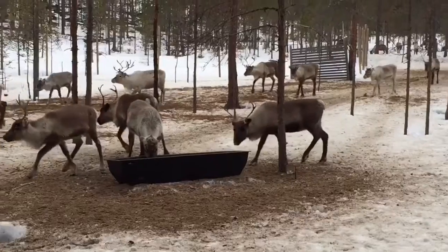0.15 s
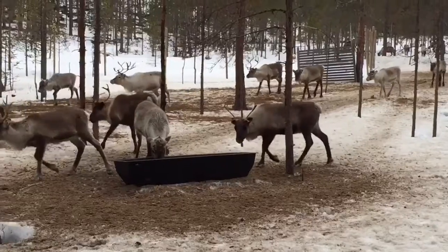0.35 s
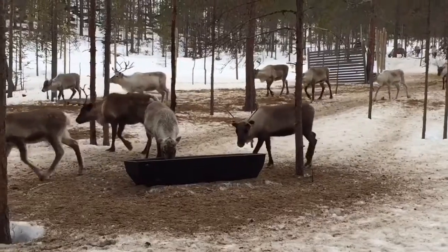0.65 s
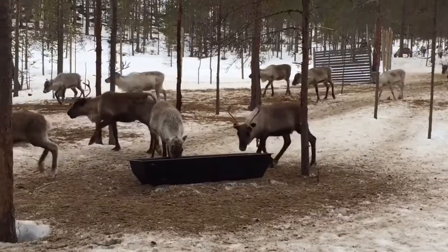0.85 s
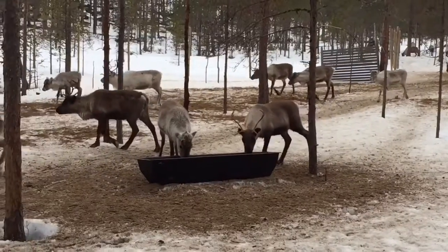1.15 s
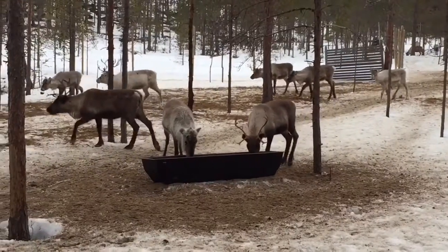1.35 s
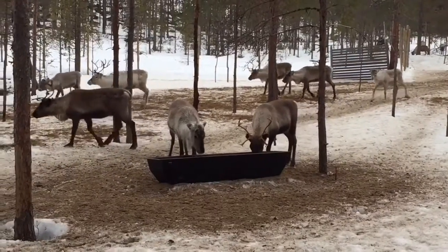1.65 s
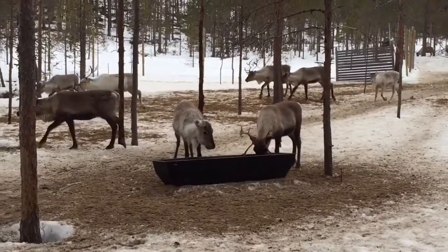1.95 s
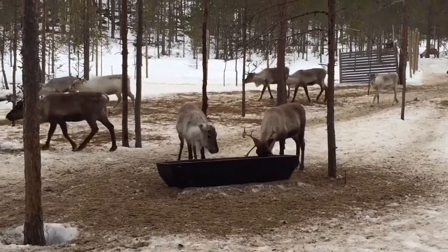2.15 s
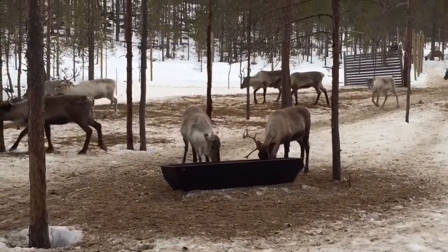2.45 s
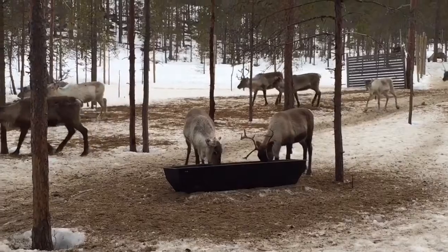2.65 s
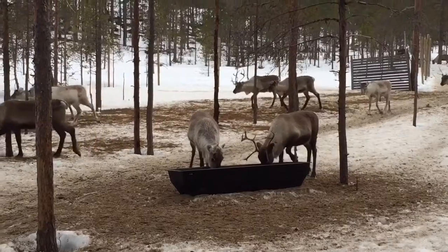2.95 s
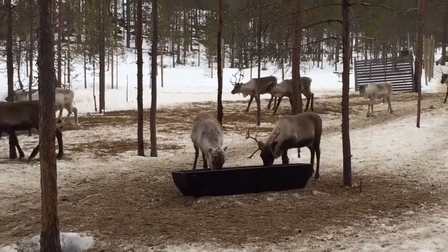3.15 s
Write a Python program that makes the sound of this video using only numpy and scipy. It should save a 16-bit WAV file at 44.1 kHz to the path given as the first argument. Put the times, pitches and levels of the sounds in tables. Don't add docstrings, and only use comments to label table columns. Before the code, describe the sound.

A dull metal collar bell clanks unevenly throughout, its hum often choked by fur. Soft hoof thuds and small dry clicks lie beneath it, with faint wind, in an open snowy pine wood, heard from some metres away.

```python
import sys
import numpy as np
from scipy import signal
from scipy.fft import rfft, irfft, next_fast_len
from scipy.io import wavfile
from scipy.ndimage import map_coordinates

SR = 44100
rng = np.random.default_rng(int(sys.argv[2]) if len(sys.argv) > 2 else 0)


def file_out(sig):
    cols = np.atleast_2d(sig).T
    lim = np.clip(cols, -1, 1)
    pcm = np.round(lim * 32767).astype(np.int16)
    wavfile.write(sys.argv[1], SR, pcm)


def field_ratio(decibels):
    return 10 ** (np.asarray(decibels, dtype=float) / 20)


N = 145530

# frequency_hz, level_db
IMPACT_SPECTRUM = [(700, -13), (1000, 17), (1600, -12), (2400, 5.4), (5000, 1.5), (10000, -3.5),
                   (15000, -4)]
TONE_HZ = [958, 1839, 3413]


def unit(x):
    return x / np.sqrt(np.mean(x ** 2) + 1e-20)


def wobble(rate):
    return map_coordinates(rng.standard_normal(int(N * rate / SR) + 4), [np.arange(N) * rate / SR])


def filtered(x, response):
    m = next_fast_len(len(x) + 8192)
    return irfft(rfft(x, m) * response(np.fft.rfftfreq(m, 1 / SR)), m)[:len(x)]


def coloured(points, size):
    f, db = np.transpose(points)
    return unit(filtered(rng.standard_normal(size), lambda hz: field_ratio(np.interp(np.log(hz + 1), np.log(f), db))))


def resonance(hz, width_hz):
    return lambda f: (f * width_hz / (hz * hz - f * f + 1j * f * width_hz)) ** 2


def add(into, s, x):
    part = into[round(s * SR):][:len(x)]
    part += x[:len(part)]


def distant_tread():
    ground_hz, level_db, lump_db = 99.4, -71, 6.5
    tread = filtered(rng.standard_normal(N), resonance(ground_hz, ground_hz))
    return field_ratio(level_db) * unit(tread * field_ratio(lump_db * wobble(13)))


def wind():
    # frequency_hz, density_db
    wind_spectrum = [(22, -51), (50, -1.5), (90, -1.6), (170, -8), (600, -11.5), (2230, -7), (4000, -11),
                     (15500, -20.5)]
    level_db = -62 + 2.4 * wobble(3.35) + 1.33 * wobble(14)
    return field_ratio(level_db) * coloured(wind_spectrum, N)


def trunk_echo(near):
    level_db, t60, first_return_s = -14, 0.33, 0.008
    u = np.arange(SR // 3) / SR
    tail = rng.standard_normal(len(u)) * field_ratio(-60 * u / t60) * (u > first_return_s)
    return field_ratio(level_db) * signal.fftconvolve(near, tail / np.linalg.norm(tail))[:N]


def hooves():
    # start_s, level_db, pitch_hz, length_s
    hoof_steps = [(.225, -64, 307, 0.039), (.425, -61.5, 320, 0.029), (.553, -56.5, 141.6, 0.037),
                  (.875, -67, 134, .03), (1.055, -51.5, 740, 0.0097), (1.06, -54, 135, 0.031),
                  (1.21, -61.5, 104, 0.0368), (1.289, -61, 600, 0.026), (1.41, -54.5, 880, 0.022),
                  (1.415, -55, 228, 0.025), (1.61, -65.5, 359, 0.0325), (2.09, -59.5, 106, 0.077),
                  (2.57, -64, 330, 0.065), (2.777, -61.5, 91, 0.027), (2.78, -62.5, 304, .03),
                  (2.81, -56.5, 398, 0.067), (2.88, -62.5, 462, 0.069), (3.128, -59.5, 275, 0.0332)]
    out = np.zeros(N)
    for s, db, hz, length in hoof_steps:
        u = np.arange(round(length * SR) + 2) / (length * SR)
        push = unit(filtered(rng.standard_normal(len(u)), resonance(hz, 0.9 * hz)))
        pressure = np.sin(np.pi * np.sqrt(np.clip(u, 0, 1)))
        add(out, s, field_ratio(db) * push * pressure)
    return out


def clicks():
    # start_s, level_db
    tendon_clicks = [
        (0.7392, -44),
        (1.0868, -38),
        (1.1548, -57.5),
        (1.3493, -41),
        (1.6566, -38.5),
        (1.7449, -47),
        (2.5769, -33.5),
        (2.6326, -38),
        (2.9598, -37.5),
        (3.2768, -32.5),
    ]
    t60, trim_db = 0.004, -6
    crumbs_per_s, crumb_db = 60, -65.5
    out = np.zeros(N)
    u = np.arange(SR // 50) / SR
    snap = coloured(IMPACT_SPECTRUM, N + SR)
    events = [(s, db + trim_db) for s, db in tendon_clicks]
    for place, chance in rng.random((int(crumbs_per_s * N / SR), 2)):
        events.append((place * N / SR, crumb_db - 3.77 * np.log(chance)))
    for s, db in events:
        add(out, s, field_ratio(db - 60 * u / t60) * snap[round(s * SR):][:len(u)])
    return out


def shell_haze():
    modes, width_hz = 170, 22
    mode_hz = 1900 + 13300 * rng.random(modes)
    gain = field_ratio(4.5 * rng.standard_normal(modes))

    def thin_modes(f):
        return sum(g * width_hz / (width_hz + 2j * (f - c)) for c, g in zip(mode_hz, gain))

    return unit(filtered(coloured(IMPACT_SPECTRUM, N), thin_modes))


def clapper_contacts():
    # start_s, clank_db, hum_db, second_tone_db, third_tone_db
    blows = [(0.1986, -25.5, -45.5, -46, -48.5), (0.355, -19, -41.5, -45.5, -34),
             (0.5425, -28.5, -35.5, -45.5, -54.5), (0.8575, -25.5, -43.5, -50.5, -47),
             (0.9672, -28, -41, -49, -51.5), (1.1954, -26, -44.5, -49, -46.5),
             (1.4733, -27.5, -45, -55, -49), (1.5518, -29.5, -55, -52, -52),
             (1.8237, -23.5, -36, -44, -49.5), (2.0886, -23, -49.5, -40, -43.5),
             (2.2167, -24, -37.5, -48, -47), (2.4269, -27.5, -38.5, -49, -64),
             (2.6983, -26.5, -38, -49.5, -49.5), (2.784, -28, -38, -46.5, -47),
             (2.9971, -30, -34.5, -47, -49)]
    # start_s, clank_db, hum_db, second_tone_db, third_tone_db
    rebounds = [(0.0279, -36.5, -44.5, -50.5, -65), (0.044, -43, -58.5, -52.5, -88),
                (0.2205, -33.5, -52, -49.5, -54.5), (0.5908, -32.5, -37, -58, -58),
                (0.6544, -32.5, -47, -54, -72), (1.1903, -32, -54, -46.5, -47.5),
                (1.245, -36, -47.5, -49.5, -56), (1.481, -28.5, -42.5, -53.5, -46.5),
                (1.575, -32, -50, -47, -71), (1.6044, -38.5, -56, -57, -58),
                (1.8715, -44.5, -45, -48.5, -50), (2.4889, -34, -48, -75, -72),
                (2.5085, -43.5, -63, -56, -71.5), (2.828, -35, -41.5, -54, -49),
                (3.0762, -42.5, -45, -50, -66), (3.1419, -44.5, -43, -57.5, -78)]
    # clank_db, hum_db, second_tone_db, third_tone_db
    ringing_db = (-38.5, -41.5, -47, -61)
    rows = np.array([(0, *ringing_db, 1)] + [(*r, 1) for r in blows] + [(*r, 0) for r in rebounds])
    return rows[np.argsort(rows[:, 0])]


def fur_choke():
    # start_s, length_s, loss_db (negative = mouth swings nearer)
    chokes = [(0.052, 0.065, 3), (0.328, 0.037, 16), (0.355, 0.06, 9.5), (.44, 0.022, 4.5),
              (0.603, 0.026, -0.5), (0.75, 0.1, 17.5), (1.025, .06, 9), (1.085, 0.023, -3.5),
              (1.275, 0.033, 52), (1.504, .05, 4), (1.607, .05, 18), (1.838, 0.032, 5.5),
              (1.875, 0.044, 11), (1.977, 0.051, 8), (2.109, .05, 6.5), (2.153, 0.05, -12),
              (2.263, 0.065, 10), (2.473, 0.026, 5.5), (2.519, 0.045, 19), (2.894, 0.032, 7.5),
              (3.01, 0.048, 6), (3.229, 0.068, 18)]
    t = np.arange(N) / SR
    lost_db = np.zeros(N)
    for s, length, db in chokes:
        progress = np.clip((t - s) / abs(length), 0, 1)
        lost_db += db * (1 - np.cos(np.pi * progress)) / 2
    return lost_db


def long_tones(contacts, choked_db, sway):
    # t60_s, choke_share
    decays = [
        (2.43, 0.94),
        (0.67, 0.67),
        (0.39, 0.82),
    ]
    # above_hz, level_db
    twins = [
        (14, -26),
        (29, -8),
        (18, -14),
    ]
    rise_s, twin_spread_db = 0.00218, 3
    rebound_turn = 0.48
    t = np.arange(N) / SR
    start_s = contacts[:, 0]
    last = np.searchsorted(start_s, t, "right") - 1
    since = t - start_s[last]
    lost_db = choked_db - choked_db[(start_s[last] * SR).astype(int)]
    scatter = np.where(contacts[:, 5:], np.pi, rebound_turn)
    turns = np.cumsum(rng.standard_normal((len(contacts), 6)) * scatter, axis=0)
    spread_db = twin_spread_db * rng.standard_normal((len(contacts), 3))
    keep = np.exp(-1 / (rise_s * SR))
    out = np.zeros(N)
    for k, (tone_hz, (t60, share), (above_hz, twin_db)) in enumerate(zip(TONE_HZ, decays, twins)):
        size = np.sqrt(2) * field_ratio(contacts[last, 2 + k] - 60 * since / t60 - share * lost_db)
        main = np.exp(1j * turns[last, 2 * k])
        twin_phase = turns[last, 2 * k + 1] + 2 * np.pi * above_hz * since
        twin = field_ratio(twin_db + spread_db[last, k]) * np.exp(1j * twin_phase)
        envelope = signal.lfilter([1 - keep], [1, -keep], size * (main + twin))
        out += (envelope * np.exp(2j * np.pi * tone_hz * sway)).imag
    return out


def clanks(contacts, choked_db, sway):
    shell_hz = [2312, 2435, 2955, 3207, 4000, 4312, 4970, 5543, 5965, 6272, 6712, 6885, 7273]
    # level_db, t60_s
    shell_modes = [(-15.5, 0.15), (-30, 0.045), (-37.5, 0.21), (-30.5, 0.17), (-20.5, 0.077), (-25, 0.12),
                   (-38.5, 0.085), (-22, .14), (-28, 0.12), (-24, 0.084), (-26.5, .22), (-41, 0.17),
                   (-24, 0.076)]
    rim_hz = [8064, 8317, 9001, 9152, 9593, 10384, 11041, 11536, 12403, 12828, 13329, 13631, 13916, 14750]
    # start_s, frequency_hz, extra_db
    favours = [(.199, 2435, 25.5), (.199, 7273, 8), (.356, 4000, 12.5), (.543, 4000, 10.5),
               (.591, 6272, 13), (.655, 2312, 8.5), (.858, 5543, 11), (.968, 8317, 20), (.968, 2312, 0.5),
               (1.196, 4000, 14), (1.196, 6272, 17.5), (1.474, 2435, 24), (1.481, 4000, 13),
               (1.552, 4312, 13), (1.552, 5543, 15), (1.575, 2312, 5.5), (1.824, 6272, 7.5),
               (2.089, 5543, 10.5), (2.089, 13916, 13.5), (2.217, 6712, 11.5), (2.427, 6272, 12.5),
               (2.699, 5543, 13)]
    rim_db, rim_t60 = -30, 0.1
    spot_spread_db, choke_share = 4.5, 0.36
    crack_db, crack_t60, haze_db, haze_t60 = -13, 0.018, -13.5, 0.13
    mouth_hz, mouth_db, mouth_t60 = 1071, -0.5, 0.066
    hz = np.array(shell_hz + rim_hz)[:, None]
    level_db, t60 = np.transpose(shell_modes + [(rim_db, rim_t60)] * len(rim_hz))[:, :, None]
    extra_db = np.zeros((len(contacts), len(hz), 1))
    for s, mode_hz, db in favours:
        nearest_contact = np.argmin(abs(contacts[:, 0] - s))
        extra_db[nearest_contact, np.argmin(abs(hz - mode_hz))] = db
    crack, haze = coloured(IMPACT_SPECTRUM, N), shell_haze()
    flutter_db = 4 * wobble(70)
    out = np.zeros(N)
    for (s, db, hum_db), more_db in zip(contacts[:, :3], extra_db):
        luck, phase = rng.standard_normal((2, len(hz), 1))
        i = round(s * SR)
        when = sway[i:i + SR // 5] - sway[i]
        n = np.arange(len(when))
        v = n / SR
        shake_db = flutter_db[(n + i + (phase * N).astype(int)) % N]
        spot_db = np.where(more_db, more_db, spot_spread_db * luck + shake_db)
        modes = field_ratio(level_db + spot_db - 60 * v / t60) * np.sin(2 * np.pi * hz * when + phase)
        hiss = crack[n + i] * field_ratio(crack_db - 60 * v / crack_t60)
        hiss += haze[n + i] * field_ratio(haze_db - 60 * v / haze_t60)
        lost_db = choke_share * (choked_db[i + n] - choked_db[i])
        add(out, s, field_ratio(db - lost_db) * (modes.sum(axis=0) + hiss))
        if s > 0:
            mouth_size = field_ratio(hum_db + mouth_db - 60 * v / mouth_t60)
            add(out, s, mouth_size * np.sin(2 * np.pi * mouth_hz * v))
    return out


def bell():
    contacts, choked_db = clapper_contacts(), fur_choke()
    sway_hz = 2.48
    sway = np.arange(N) / SR + np.cumsum(wobble(6.3)) / SR * sway_hz / TONE_HZ[0]
    out = long_tones(contacts, choked_db, sway) + clanks(contacts, choked_db, sway)
    return signal.sosfilt(signal.butter(N=4, Wn=850, btype="high", fs=SR, output="sos"), out)


def scene():
    near = bell() + clicks()
    return (near + trunk_echo(near) + hooves() + wind() + distant_tread())[None]


def roll_off(x):
    return signal.sosfilt(signal.butter(12, 16450, fs=SR, output="sos"), x)


def record(dry):
    # frequency_hz, gain_db
    band_limit = [(15150, 0), (15400, -24), (16000, -36), (16500, -40)]
    mix = filtered(dry[0], lambda hz: field_ratio(np.interp(hz, *np.transpose(band_limit))))[None]
    return roll_off(mix)


dry = scene()
out = record(dry)
file_out(out)
```